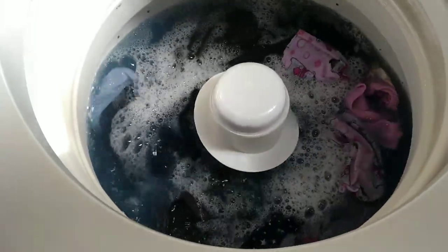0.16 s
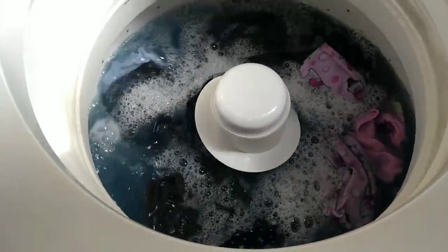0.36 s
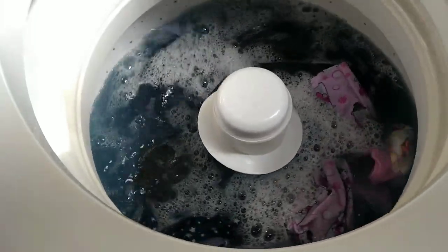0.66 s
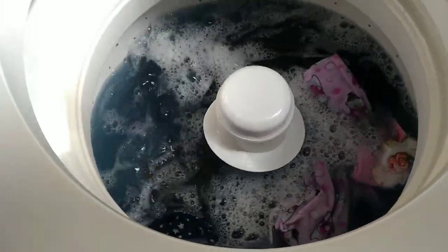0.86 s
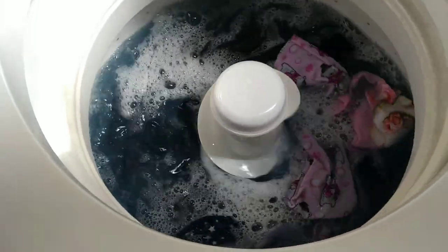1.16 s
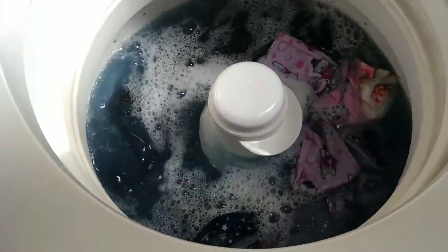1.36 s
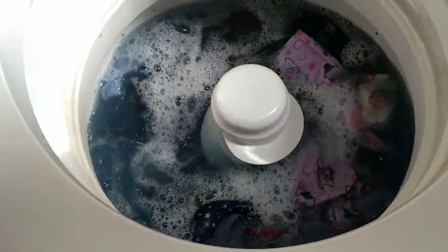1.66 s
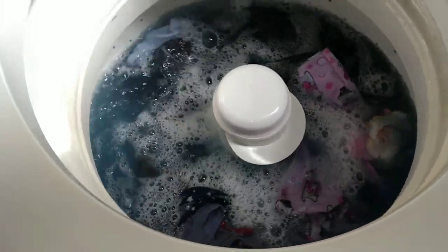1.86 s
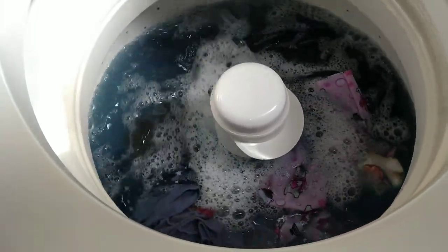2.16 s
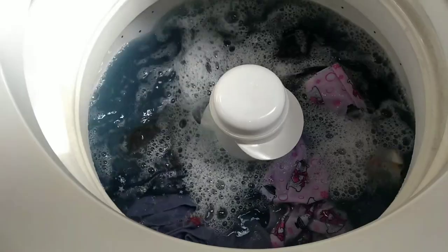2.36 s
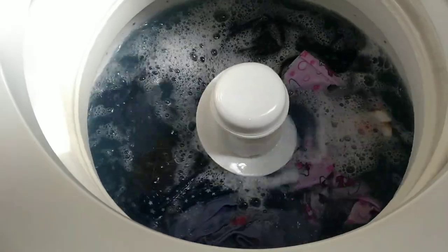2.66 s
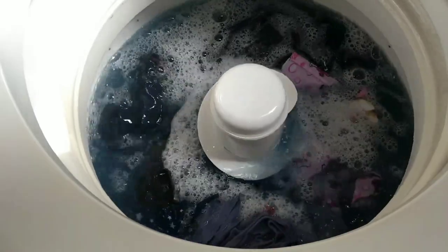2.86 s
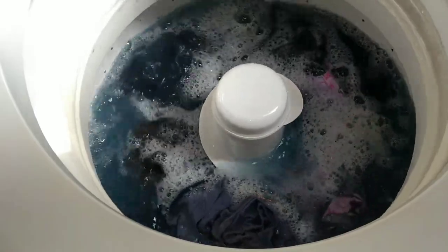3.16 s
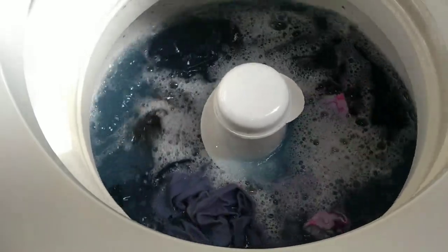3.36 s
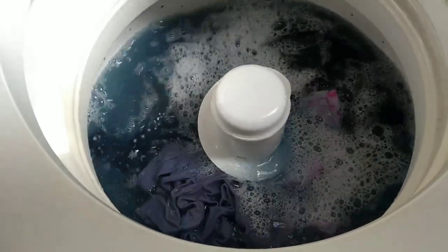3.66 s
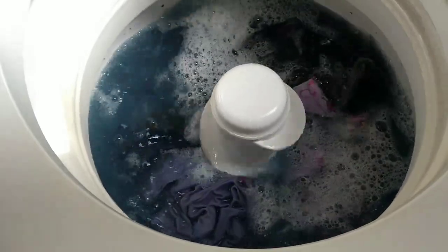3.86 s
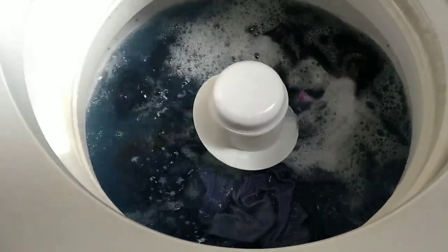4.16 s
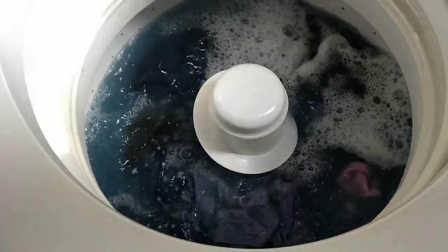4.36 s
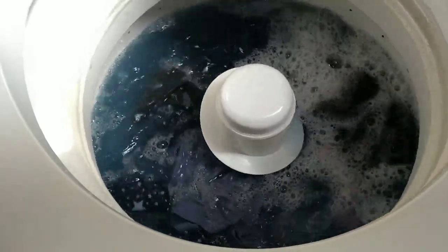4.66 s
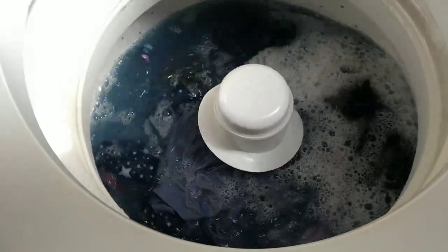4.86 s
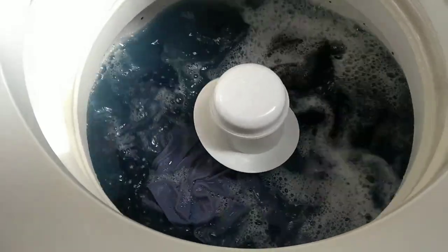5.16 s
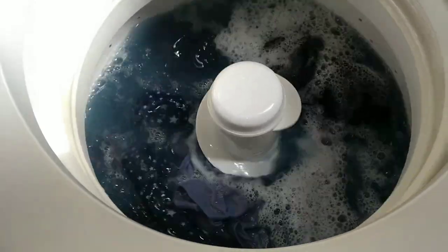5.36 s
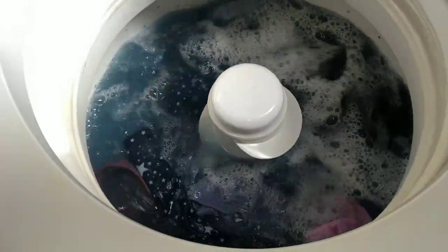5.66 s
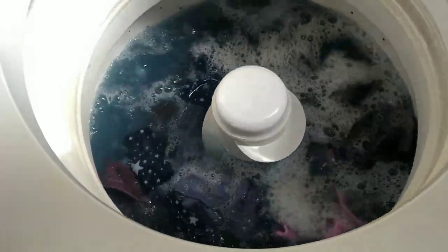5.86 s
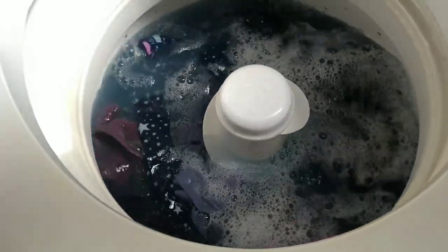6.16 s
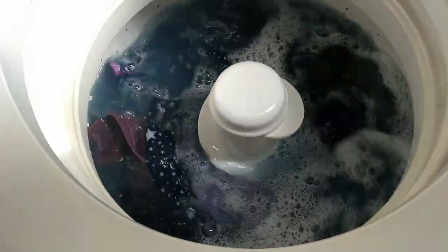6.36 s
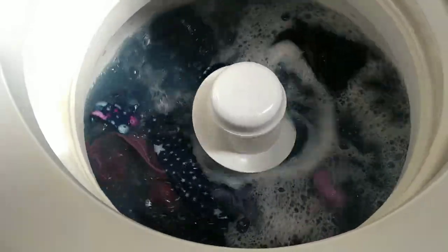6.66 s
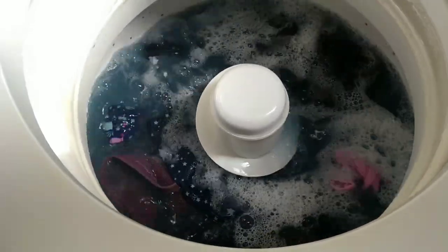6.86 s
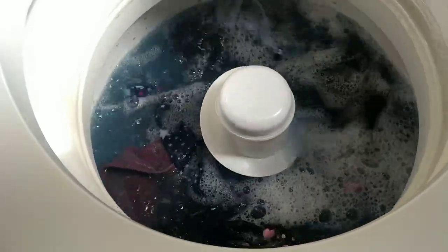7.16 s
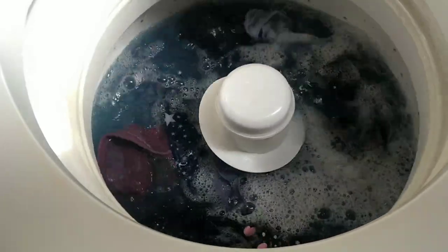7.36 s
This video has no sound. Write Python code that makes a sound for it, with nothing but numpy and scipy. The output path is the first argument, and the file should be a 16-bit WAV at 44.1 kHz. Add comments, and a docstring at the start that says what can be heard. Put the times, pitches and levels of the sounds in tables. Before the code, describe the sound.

Close above the open tub of a top-load washer, in wide stereo from two small camera microphones. In the first 0.3 s, sharp wet slaps and a burst of fizz arrive with a jerky, ringing scrape along the metal tub wall. A push follows to about 0.5 s, then a brief lull. From 0.9 s agitator strokes repeat about every 0.6 to 0.75 s, through 1.6, 2.3, 3.0, 3.7, 4.4, 5.1, 5.7, 6.3 and 6.9 s. Each builds a low growl and mains-like hum with booming panels for a third of a second, then coasts down while water keeps churning and suds hiss. Knocks stand out near 0.9, 3.1, 5.1, 5.7, 6.9 and 7.5 s. Hollow bubble plops pop at 0.4, 3.8, 5.1, 5.6 and 6.4 s, among fine droplets and gurgles. It stops mid-cycle around 7.5 s.

```python
"""Slaps and fizz of sudsy water come first, with a scrape along the tub wall: a top-load washer agitates wet laundry.
Place: the open tub. Distance: just above it. Microphones: the two small ones of a camera.
The drive growls and hums under each stroke, through ringing panels, and knocks, mostly as a stroke starts.
Water is filtered grainy noise that churns, splashes and fizzes; bubbles and drips are short tones.
The camera widens its pair by subtracting from each side a delayed share of the other."""
import sys
import numpy as np
from scipy import signal
from scipy.fft import rfft, irfft
from scipy.io import wavfile
from scipy.ndimage import uniform_filter1d

SR = 44100
rng = np.random.default_rng(int(sys.argv[2]) if len(sys.argv) > 2 else 0)


def natural_amplitude(level_db):
    """Convert a level in decibels to a linear amplitude factor, elementwise."""
    exponent = np.asarray(level_db, float) / 20
    return 10 ** exponent


def materialize(psi):
    """Save the field psi as 16-bit PCM at rate SR to the path in sys.argv[1].

    A 1-D psi becomes a single channel; in a 2-D psi each row is a channel.
    """
    bounded = np.clip(np.atleast_2d(psi).T, -1, 1)
    quanta = np.round(bounded * 32767).astype(np.int16)
    wavfile.write(sys.argv[1], SR, quanta)


N = 331632
T = np.arange(N) / SR
HZ = np.fft.rfftfreq(N, 1 / SR)
MAINS_HZ = 59.78
MID_LOAD_DB = -35  # a middling load on the drive


def evened(x):
    """Scales a sound to an rms of one."""
    return x / np.sqrt(np.mean(x ** 2) + 1e-20)


def read(points, hz, col=1):
    """Reads a table column along a log-frequency axis."""
    points = np.asarray(points)
    return np.interp(np.log(hz + 1), np.log(points[:, 0] + 1), points[:, col])


def modes(peaks, hz):
    """Complex response of resonances given as (Hz, width Hz, dB)."""
    return sum(natural_amplitude(db) * .5 * width / (.5 * width + 1j * (hz - f)) for f, width, db in peaks)


def colour(x, gain):
    """Filters by a response over HZ and evens the level."""
    return evened(irfft(rfft(x) * gain, N))


def grainy(per_s, spread_db, ms, share):
    """Two noises that share a train of short random bursts on top of a steady part."""
    struck = rng.random(N) < per_s / SR
    size = natural_amplitude(spread_db * np.minimum(rng.exponential(1, N), 3.5)) * struck
    decay = np.exp(-1000 / (ms * SR))
    bursts = evened(signal.lfilter([1], [1, -decay], size))
    return (1 + share * bursts) * rng.standard_normal((2, N))


def patchy(x, patch_db, frames, bins, size=256):
    """Lets the level wander at random in patches of time and frequency."""
    z = signal.stft(x, nperseg=size)[2]
    field = uniform_filter1d(rng.standard_normal(z.shape[1:]), bins, axis=0)
    field = evened(uniform_filter1d(field, frames, axis=1))
    return evened(signal.istft(z * natural_amplitude(patch_db * field), nperseg=size)[1][:, :N])


def slow_noise(*shape):
    """Smoothed random drift, one value every 64 samples."""
    return uniform_filter1d(rng.standard_normal((*shape, N // 64 + 1)), 35)


def held(drift):
    """Evens a drift and holds each value for 64 samples."""
    return np.repeat(evened(drift), 64, axis=-1)[..., :N]


def add(mix, s, sound):
    """Mixes a sound in at a time."""
    part = mix[:, round(s * SR):][:, :sound.shape[-1]]
    part += sound[..., :part.shape[1]]


def burst(gain, start_db, t60, rise_ms, crack_db=0.):
    """A dying puff of noise with the response gain(hz), its first contact louder by crack_db."""
    t = np.arange(8192) / SR
    noise = rng.standard_normal((2, len(t)))
    puff = irfft(rfft(noise) * gain(np.fft.rfftfreq(len(t), 1 / SR)))
    fall = natural_amplitude(start_db - 60 * t / t60 + crack_db * np.exp(-t * 700))
    return fall * np.minimum(t * 1000 / rise_ms, 1) * evened(puff) / 2


def bubble(hz, t60, glide, size=1536):
    """A dying tone of a bubble; glide sets how fast its pitch creeps up."""
    t = np.arange(size) / SR
    rise = np.minimum(t * hz / 4.8, 1)
    return natural_amplitude(-60 * t / t60) * rise * np.sin(2 * np.pi * hz * t * (1 + glide * t))


def swells(crest_s, crest_db, rise_s, fall_db_per_s, floor_db):
    """Level in dB of swells that climb 15 dB per rise_s and die away, their powers added over a floor."""
    t = T[::64, None] - crest_s
    climb_db = 15 * t / np.maximum(rise_s, .002)
    each_db = crest_db + np.where(t < 0, climb_db, -np.abs(fall_db_per_s) * t)
    power = (natural_amplitude(each_db) ** 2).sum(axis=1)
    return 10 * np.log10(np.interp(T, T[::64], power) + natural_amplitude(floor_db) ** 2)


# agitator strokes; the load builds while the vanes push:
# (start [s], push [s], jolt [dB], first load [dB], last load [dB], coasting fall [dB/s])
AGITATOR_STROKES = [(0.064, 0.44, -45, -37, -26, 78), (0.888, 0.33, -27, -36, -27, 213),
                    (1.62, 0.34, -66, -39, -24.5, 234), (2.31, 0.36, -52, -37, -26.5, 182),
                    (3.029, 0.33, -49, -34, -24.5, 151), (3.683, 0.34, -26, -35, -28.5, 118),
                    (4.43, 0.36, -65, -38.5, -25, 202), (5.075, 0.34, -34, -36.5, -25, 247),
                    (5.671, 0.34, -28.5, -32, -25.5, 141), (6.284, 0.33, -30, -34.5, -26.5, 117),
                    (6.88, 0.37, -23.5, -36, -26, 240), (7.455, 0.024, -39, -53, -45, 233)]


def load():
    """Load on the drive in dB: a jolt, a push from first to last load, then coasting down to idle."""
    grip_s, jolt_fall, idle_db = 0.02, 206, -41.5  # the vanes take hold; jolt fall in dB per s
    drift_db, drift_fall = -12, 78  # the water keeps turning after a push; fall in dB per s
    start, push, jolt_db, first_db, last_db, coast = np.transpose(AGITATOR_STROKES)
    t = T[::64, None] - start
    after = np.maximum(t - push, 0)
    pushing = natural_amplitude(first_db + (last_db - first_db) * np.clip(t / push, 0, 1)) ** 2
    coasting = natural_amplitude(-coast * after) ** 2 + (after > 0) * natural_amplitude(drift_db - drift_fall * after) ** 2
    jolt = natural_amplitude(jolt_db - jolt_fall * np.maximum(t - grip_s, 0)) ** 2
    grip = np.clip(t / grip_s, 0, 1) ** 2
    power = (grip * (pushing * coasting + jolt)).sum(axis=1)
    return 10 * np.log10(np.interp(T, T[::64], power) + natural_amplitude(idle_db) ** 2)


# water surging over the load:
# (crest time [s], rise by 15 dB [s], fall [dB/s], churn level [dB], splash level [dB], fizz level [dB])
WATER_SURGES = [(.06, 0.036, 290, -30, -28, -30), (0.098, 0.021, 35, -62, -28, -31),
                (.31, 0.16, 36, -34.5, -60, -68), (.48, 0.24, 103, -41, -35.5, -54),
                (.67, 0.074, 93, -65, -62, -42), (.82, 0.05, 206, -99, -59, -40.5),
                (.9, 0.0082, 487, -37.5, -60, -46), (.92, 0.01, 299, -72, -39.5, -41),
                (1.07, 0.094, 62, -35, -50, -48), (1.251, 0.068, 30, -41, -46, -41),
                (1.36, 0.095, 81, -48, -48, -42), (1.53, 0.17, 123, -40.5, -41.5, -35),
                (1.677, 0.051, 46, -42, -47, -38), (1.968, 0.45, 145, -34.5, -39.5, -47),
                (2.05, 0.076, 156, -49, -43, -35.5), (2.34, 0.033, 62, -35.5, -62, -53),
                (2.62, 0.62, 152, -36.5, -44.5, -53), (2.718, 0.032, 156, -51, -44.5, -37),
                (3.08, 0.033, 292, -42, -45, -64), (3.19, 0.073, 53, -33.5, -38, -38.5),
                (3.54, 0.63, 82, -44.5, -50, -38.5), (3.72, 0.095, 325, -39.5, -45, -61),
                (3.919, 0.089, 100, -36, -42.5, -62), (4.12, 0.13, 80, -43, -44, -39),
                (4.23, 0.075, 47, -41.5, -46.5, -42), (4.48, 0.079, 166, -57, -47, -34.5),
                (4.65, 0.097, 60, -38, -42.5, -45), (4.71, 0.043, 80, -47, -41.5, -33.5),
                (4.79, 0.061, 197, -40, -62, -58), (4.96, 0.13, 125, -64, -54, -42),
                (5.089, 0.016, 598, -41, -40, -54), (5.36, 0.12, 100, -41, -43.5, -38),
                (5.44, 0.025, 210, -39, -48, -38), (5.57, 0.13, 29, -38, -49, -43),
                (5.72, 0.033, 104, -52, -39.5, -42), (5.84, 0.016, 45, -42, -39.5, -49),
                (5.99, 0.16, 163, -36, -47, -42), (6.21, 0.02, 203, -60, -52, -46),
                (6.27, 0.046, 142, -69, -49, -48), (6.658, 0.55, 42, -38.5, -46.5, -66),
                (6.8, 0.081, 249, -43.5, -55, -41), (6.91, .03, 80, -39, -48, -42),
                (6.98, 0.04, 33, -60, -42, -38.5), (7.18, 0.29, 89, -34, -39.5, -44),
                (7.35, 0.037, 56, -43, -60.5, -48)]


def surges(col, floor_db):
    """Level in dB of one voice of the water: the surges over its steady part."""
    rows = np.transpose(WATER_SURGES)
    return swells(rows[0], rows[col], rows[1], rows[2], floor_db)


def splashing():
    """Level in dB of the splash, its steady part following a third of the load swing."""
    return surges(col=4, floor_db=-53 + 0.33 * (load() - MID_LOAD_DB))


# fizz between surges: (time [s], level [dB])
FIZZ_LEVEL = [(0, -38), (.3, -73), (.6, -60), (1., -42), (1.4, -56), (1.9, -41.5), (2.2, -46.5), (2.5, -39),
              (3., -50), (3.4, -48), (3.8, -45), (4.2, -45.5), (4.6, -74), (5.1, -44), (5.6, -44),
              (6.1, -49), (6.6, -44), (7.1, -49), (7.52, -50.5)]
# shape of the fizz spectrum: (frequency [Hz], relative density [dB per Hz])
FIZZ_SPECTRUM = [(3000, -12), (6000, -9), (7500, -9.5), (9500, -8.5), (12000, -5), (13500, -6), (14200, -4)]


def fizz():
    """Suds fizz: grainy treble noise in drifting patches, over a bed and in surges."""
    grains = grainy(70.0, spread_db=7.0, ms=15.0, share=0.29)
    suds = patchy(colour(grains, natural_amplitude(read(FIZZ_SPECTRUM, HZ))), patch_db=2.5, frames=8, bins=10)
    bed_db = np.interp(T, *np.transpose(FIZZ_LEVEL))
    return natural_amplitude(surges(col=5, floor_db=bed_db)) * suds


# shape of the splash spectrum: (frequency [Hz], relative density [dB per Hz])
SPLASH_SPECTRUM = [(700, -25), (1300, -4), (1900, -0.5), (2700, 8.5), (3300, -3), (4500, 0.5), (6200, -6),
                   (7500, 0), (10000, -71)]


def splash():
    """Breaking water: grainy noise whose level wanders in patches as water moves about the tub."""
    grains = grainy(90., spread_db=5.0, ms=17.0, share=0.39)
    spray = colour(grains, natural_amplitude(read(SPLASH_SPECTRUM, HZ)))
    return natural_amplitude(splashing()) * patchy(spray, patch_db=3.5, frames=8, bins=3)


# resonances of the steel tub: (frequency [Hz], undamped width [Hz], relative level [dB])
TUB_MODES = [(558, 9.5, 3.5), (872, 9.5, -2.5), (1337, 7.2, -6.5), (1352, 7.4, 4), (1350, 4.9, -24),
             (1500, 6.7, -14), (1530, 11.5, -8), (1670, 5.6, -2), (1774, 6.7, -16)]


def tub_ring(hz, damping=1):
    """Response of the steel tub; damping widens its resonances."""
    return modes(np.multiply(TUB_MODES, [1, damping, 1]), hz)


# shape of the churn spectrum before the tub's ring: (frequency [Hz], relative density [dB per Hz])
CHURN_SPECTRUM = [(300, 13.5), (700, 0), (830, -3), (1000, 5.5), (1400, 5), (1900, -0.5), (2400, -20),
                  (3500, -5.5), (6000, -65)]


def churn():
    """Turning water: grainy noise that rings the tub a little."""
    grains = grainy(120., spread_db=5.0, ms=9.9, share=0.2)
    water = colour(grains, natural_amplitude(read(CHURN_SPECTRUM, HZ)) * abs(1 + 0.85 * tub_ring(HZ)))
    steady_db = -45.5 + 0.75 * (load() - MID_LOAD_DB)
    return natural_amplitude(surges(col=3, floor_db=steady_db)) * patchy(water, patch_db=3.4, frames=3, bins=3, size=1024)


# magnetic hum of the motor: (multiple of the mains, mid level [dB], share of the load swing followed)
MOTOR_HUM = [(1, -51.5, 0.28), (2, -43.5, 0.11), (6, -50, 1.36), (8, -54.5, 1.46), (10, -52, 0.96),
             (12, -60, 0.61), (14, -57, 1.05), (16, -61.5, 0.68), (18, -63, 0.46), (20, -63, 2)]


def hum():
    """Multiples of the mains grow with the load and waver in pitch and level."""
    load_db = load()
    swing_db = load_db - load_db.mean()
    out = np.zeros(N)
    for (k, db, follow), drift, wander in zip(MOTOR_HUM, *held(slow_noise(2, len(MOTOR_HUM)))):
        tone = np.sin(2 * np.pi * (k * MAINS_HZ * T + rng.random()) + .07 * k * drift)
        out += np.sqrt(2) * natural_amplitude(db + follow * swing_db + 3.2 * wander) * tone
    return np.stack([out, 0 * out])


# shape of the rumble spectrum: (frequency [Hz], relative density [dB per Hz])
RUMBLE_SPECTRUM = [(25, 1), (60, -3), (102, 16), (200, -39)]


def rumble():
    """The frame shakes in slow lumps: bass noise, barely following the load."""
    load_db = load()
    shake = colour(rng.standard_normal((2, N)), natural_amplitude(read(RUMBLE_SPECTRUM, HZ)))
    shake = patchy(shake, patch_db=1.5, frames=3, bins=3, size=4096)
    return natural_amplitude(-45.0 + 0.072 * (load_db - load_db.mean())) * shake


# shape of the growl spectrum before the cabinet: (frequency [Hz], relative density [dB per Hz])
GROWL_SPECTRUM = [(25, -45), (60, -7.5), (100, -4.5), (170, 1.5), (300, -8), (430, -9.5), (620, -11),
                  (860, -22.5), (1300, -30), (2500, -75)]
# panels round the drive: (frequency [Hz], width [Hz], relative level [dB])
CABINET_MODES = [(98.3, 4.7, 7.5), (156.5, 6.8, 4.5), (188.5, 24, -0.5), (405, 11, 4), (534, 15.5, 1),
                 (657, 14, -4.5), (725, 16, 0), (1116, 18, 8)]
# thin panels, response squared in use: (frequency [Hz], width [Hz], relative level before squaring [dB])
THIN_PANEL_MODES = [(674, 10, 1), (604, 12, -3), (841, 9.2, -6), (414.3, 15, 3), (538, 4.8, -4),
                    (1128, 17, -2.5), (1674, 8, -19), (3490, 10, -8), (3610, 10, -8), (3650, 10, -8.5)]
# the largest panel booms in the strokes, often late in the push:
# (crest time [s], level [dB], rise by 15 dB [s], fall [dB/s])
BOOM_SWELLS = [(.14, -35, .12, 31), (.46, -35.5, 0.046, 108), (1.189, -40.5, 0.29, 24),
               (1.95, -30, 0.068, 131), (2.509, -33, 0.045, 54), (3.158, -29.5, .04, 55),
               (3.98, -34.5, 0.29, 115), (4.69, -27, 0.068, 90), (5.09, -41, 0.054, 108),
               (5.38, -34, 0.19, 179), (5.93, -31.5, 0.14, 95.5), (6.472, -31.5, 0.037, 62),
               (6.89, -35, 0.047, 100), (7.2, -31, 0.25, 117), (7.48, -45.5, .05, 94)]
# the largest panel, response squared in use: (frequency [Hz], width [Hz], relative level before squaring [dB])
BOOM_PANEL_MODES = [(258.2, 10.4, 1), (291, 49, 0)]


def gears():
    """Uneven tooth contacts shake the cabinet into a growl, thin panels into ringing, the largest into booms."""
    load_db = load()
    swing_db = load_db - MID_LOAD_DB
    teeth = grainy(70., spread_db=4.0, ms=5.8, share=0.31)
    growl = colour(teeth, natural_amplitude(read(GROWL_SPECTRUM, HZ)) * abs(2.2 + modes(CABINET_MODES, HZ)))
    # the growl is lumpy: narrow bands swell and fade at random
    out = natural_amplitude(load_db) * patchy(growl, patch_db=3.3, frames=4, bins=2, size=2048)
    thin = colour(teeth, modes(THIN_PANEL_MODES, HZ) ** 2)
    out += natural_amplitude(-48.5 + 0.73 * swing_db) * patchy(thin, patch_db=4., frames=6, bins=2, size=2048)
    boom_db = swells(*np.transpose(BOOM_SWELLS), floor_db=-58.0) + 0.18 * swing_db
    return out + natural_amplitude(boom_db) * colour(teeth, modes(BOOM_PANEL_MODES, HZ) ** 2)


def droplets(count=2000):
    """A patter of small bubbles, louder in a splash up to a ceiling; most ring near 3 kHz."""
    out = np.zeros((2, N))
    for when, pitch, ring, size, side in rng.random((count, 5)):
        hz = np.clip(3100 * (pitch / (1 - pitch)) ** .17, 700, 10000)
        blip = (1 - .95 * size) ** -.45 * bubble(hz, t60=(12. + 40. * ring) / hz, glide=3.)
        add(out, when * N / SR, blip * [[np.cos(np.pi * side)], [np.sin(np.pi * side)]])
    return natural_amplitude(np.minimum(splashing(), -40.) - 7.0) * evened(out)


def spatter(count=420):
    """Thrown drops hit the tub and the lid rim: crisp, wide ticks, a few of them large."""
    out, t = np.zeros((2, N)), np.arange(1024) / SR
    hz = np.fft.rfftfreq(len(t), 1 / SR) + 1
    fall = natural_amplitude(-60 * t / 0.026) * np.minimum(t * 3000, 1)  # T60 0.026 s
    for when, pitch, wide, size in rng.random((count, 4)):
        centre_hz, octaves = 2000.0 * 2.5 ** pitch, 1.1 + 0.95 * wide
        noise = rng.standard_normal((2, len(t)))
        tick = irfft(rfft(noise) * np.exp(-(np.log2(hz / centre_hz) / octaves) ** 2))
        add(out, when * N / SR, (1 - .9 * size) ** -.55 * fall * evened(tick))
    return natural_amplitude(splashing() - 15.5) * evened(out)


def gurgles(count=450):
    """Air squeezed from the laundry rises as large bubbles with climbing pitch, more strongly under load."""
    out = np.zeros((2, N))
    for when, pitch, ring, size, side in rng.random((count, 5)):
        hz = np.clip(600 * (pitch / (1 - pitch)) ** .3, 200, 2200)
        blip = bubble(hz, t60=(20.0 + 72.0 * ring) / hz, glide=1.9, size=4096)
        blip = (1 - .9 * size) ** -.5 * blip
        add(out, when * N / SR, blip * [[1], [np.sin(np.pi * side)]])
    return natural_amplitude(-52 + load() - MID_LOAD_DB) * evened(out)


# slaps of water: (time [s], level of the puff [dB], centre [Hz], width [octaves])
WATER_SLAPS = [(0.0437, -14, 2600, 3.2), (0.098, -13.5, 3740, 1.4), (0.162, -14, 2910, 2.4),
               (0.4568, -17.5, 4200, 1.1), (0.5164, -27, 3770, 0.69), (0.9085, -23, 5200, 0.75),
               (1.878, -27.5, 3340, 0.42), (1.949, -29, 3120, 0.78), (2.0037, -30, 3190, 0.46),
               (2.031, -27, 3110, 0.93), (2.058, -32, 6000, 2), (3.1605, -27, 3500, 0.84),
               (3.187, -21.5, 5930, 1.3), (3.311, -24.5, 3640, 0.95), (3.716, -21, 3200, 0.46),
               (3.91, -30, 3000, 0.38), (4.0475, -23.5, 3730, 1.8), (4.452, -33, 8450, 0.43),
               (4.4735, -23, 10600, 0.7), (4.4805, -21.5, 11000, .4), (4.655, -29.5, 3660, 0.42),
               (5.079, -37, 2770, 1.1), (5.713, -35, 3400, 0.36), (5.828, -31, 3350, 0.47),
               (5.9546, -24.5, 3520, 0.94), (6.2153, -26, 12500, 0.2), (6.313, -30.5, 7500, 0.4),
               (6.8, -21, 6450, 0.95), (6.8887, -26.5, 10900, 0.58), (6.9054, -28, 3520, 1.1),
               (6.9297, -22.5, 3470, 1.1), (6.948, -26, 4500, 0.75), (6.987, -30, 5460, 0.37),
               (7.2, -32, 3490, 0.6)]


def slaps():
    """Water slaps: short puffs of noise, each with a crack at first contact."""
    out = np.zeros((2, N))
    for s, db, centre_hz, octaves in WATER_SLAPS:
        def band(hz):
            return np.exp(-(np.log2((hz + 1) / centre_hz) / octaves) ** 2)
        add(out, s, burst(band, db, t60=0.024, rise_ms=0.81, crack_db=5.))
    return out


# knocks of the drive, most as a stroke starts, some during or after a push:
# (time [s], level [dB], brightness [dB per octave])
DRIVE_KNOCKS = [(0.052, -34, 6), (.489, -31, -18), (0.896, -24.5, -6.5), (2.336, -39, -8), (3.04, -28, -13),
                (3.148, -23, -35), (3.708, -26, -32), (5.012, -29.5, -17), (5.081, -20, -12),
                (5.425, -25.5, -4.5), (5.696, -23, -9.5), (5.972, -25, -7), (5.984, -32, -6.5),
                (6.289, -22.5, -11), (6.889, -16.5, -18), (7.349, -26, -9), (7.465, -20, -17)]


def knocks():
    """The drive knocks: dying puffs of noise, tilted in brightness, that ring the tub."""
    out = np.zeros((2, N))
    for s, db, tilt_db in DRIVE_KNOCKS:
        def blow(hz):
            tilt = natural_amplitude(tilt_db * np.log2(1 + hz / 500)) * hz / (hz + 200)
            return tilt * abs(0.5 + tub_ring(hz))
        add(out, s, burst(blow, db, t60=0.1, rise_ms=.8))
    return out


# the tub wall rings: a jerky scrape at first, then two later knocks: (time [s], level [dB], fall [dB/s])
WALL_RINGS = [(0.057, -22.5, 698), (.086, -24, 500), (0.112, -23.5, 250), (.14, -32, 300),
              (0.183, -25.5, 300), (.215, -33, 200), (.29, -33.5, 87.5), (.5, -53, 43), (5.09, -39.5, 153),
              (5.606, -38, 100)]


def tub_wall():
    """Swells of fast small clicks excite the tub wall, their level wandering at random in patches."""
    s, db, fall = np.transpose(WALL_RINGS)
    direct = 0.073 * HZ / (HZ + 500) / (1 + (HZ / 4400.0) ** 4)
    ring = tub_ring(HZ, damping=2.6) + direct  # wet laundry against the wall damps it
    clicks = grainy(141.3, spread_db=6., ms=0.48, share=0.29)
    clicks = patchy(clicks, patch_db=3., frames=5, bins=3, size=512)
    clicks = natural_amplitude(swells(s, db, 0.015, fall, floor_db=-120)) * clicks
    return irfft(rfft(clicks) * ring / np.sqrt(np.mean(abs(ring) ** 2)), N)


# the larger bubbles and drips, mostly on the left: (time [s], level [dB], pitch [Hz])
BUBBLE_PLOPS = [(0.366, -19, 1390), (0.901, -27, 1280), (0.919, -22, 4980), (1.225, -23, 2411),
                (2.713, -21.5, 1137), (3.0683, -40, 2840), (3.082, -25.5, 2780), (3.823, -17.5, 1180),
                (4.046, -31, 6280), (4.064, -32, 3320), (4.1035, -28, 2700), (4.114, -23, 1290),
                (4.327, -30, 3690), (4.859, -28, 2526), (5.085, -14, 1330), (5.601, -13.5, 1310),
                (5.756, -21, 2460), (6.138, -24, 1250), (6.211, -36, 3320), (6.225, -39, 3270),
                (6.231, -34, 5800), (6.412, -17, 2390), (6.4506, -33, 2800), (6.4756, -27, 2770),
                (6.489, -30, 3010), (6.651, -30, 2800), (6.672, -32, 3050), (6.896, -19.5, 1330),
                (6.962, -29, 3520), (7.3147, -35, 3330), (7.464, -22, 1030)]


def plops():
    """Larger bubbles and drips: short, nearly steady tones."""
    out = np.zeros((2, N))
    for s, db, hz in BUBBLE_PLOPS:
        add(out[:1], s, natural_amplitude(db) * bubble(hz, t60=0.024, glide=.8))
    return out


# the hum sings out in the strokes, mostly near the end of a push:
# (crest time [s], level [dB], rise by 15 dB [s], fall [dB/s])
SING_SWELLS = [(.52, -36.5, 0.18, 82), (1.23, -39.5, 0.35, 253), (1.96, -36, 0.31, 121),
               (2.65, -32, 0.1, 172), (3.3, -47, 0.48, 62), (4.03, -34, 0.32, 247), (4.78, -43, 0.24, 145),
               (5.35, -38, 0.1, 92), (6.02, -38.5, 0.43, 170), (6.33, -37.5, 0.029, 39),
               (6.92, -41, 0.1, 24)]


def sing():
    """The tenth multiple of the mains swells, slowly wavering in pitch and level."""
    drift, wander = held(uniform_filter1d(slow_noise(2), 40))
    tone = natural_amplitude(2.5 * wander) * np.sin(2 * np.pi * 10 * MAINS_HZ * T + .8 * drift)
    out = natural_amplitude(swells(*np.transpose(SING_SWELLS), floor_db=-90)) * evened(tone)
    return np.stack([out, 0 * out])


# microphone pair before widening:
# (frequency [Hz], likeness [0 to 1], right lead [radians], left minus right [dB])
MICROPHONE_PAIR = [(30, 0.9, 0, 0.9), (70, 0.958, -0.08, 1.3), (120, 0.982, -0.04, 1.0),
                   (180, 0.964, -0.2, 1.3), (270, 0.981, -0.08, 1.0), (400, 0.871, -0.33, 0.7),
                   (560, 0.845, -0.23, -0.7), (750, 0.454, -1.02, 0.5), (950, 0.342, -0.22, 2.4),
                   (1300, 0.186, 0, 0.6), (1800, 0, 0, 2.0), (2800, 0.164, 0, 2.8), (4200, 0, 0, 1.3),
                   (6500, 0, 0, -0.2), (9000, 0, 0, -1.6), (13000, 0.032, 0, -4.8)]


def scene():
    """Two versions of the sound field blend into the two microphones, most alike in the bass."""
    water = fizz() + splash() + churn() + droplets() + spatter() + gurgles() + slaps() + plops()
    drive = hum() + rumble() + gears() + knocks() + sing()
    a, b = rfft(water + drive + tub_wall())
    like = np.clip(read(MICROPHONE_PAIR, HZ), -1, 1)
    lead = np.exp(1j * read(MICROPHONE_PAIR, HZ, col=2))
    right = (like * a + np.sqrt(1 - like ** 2) * b) * lead
    lean = natural_amplitude(.5 * read(MICROPHONE_PAIR, HZ, col=3))
    return irfft([a * lean, right / lean], N)


# stereo widening: (frequency [Hz], share of the other side subtracted)
WIDENING_SHARE = [(1000, .8), (2400, .9), (4700, .9), (7000, .62), (9000, .42), (12000, .18)]


def widen(z):
    """Each side loses a duller copy of the other, delayed by 1/2360 s."""
    share = np.clip(read(WIDENING_SHARE, HZ), 0, 1)
    return z - z[::-1] * share * np.exp(-2j * np.pi * HZ / 2360)


def roll_off(x):
    """The treble ends steeply here."""
    return signal.sosfilt(signal.butter(12, 14980, fs=SR, output="sos"), x)


def record(dry):
    """The camera limits the band at both ends and widens the stereo."""
    z = rfft(dry) / (1 + (HZ / 14240) ** 300)  # top of the recorder's band in Hz
    z = z * HZ ** 2 / (HZ ** 2 + 46.0 ** 2)  # the small microphones lose the deepest bass
    mix = irfft(widen(z), N)
    return roll_off(mix)


dry = scene()
out = record(dry)
materialize(out)
```